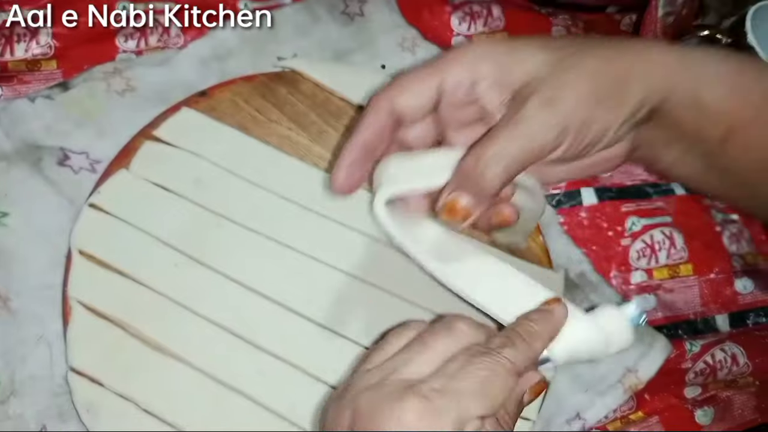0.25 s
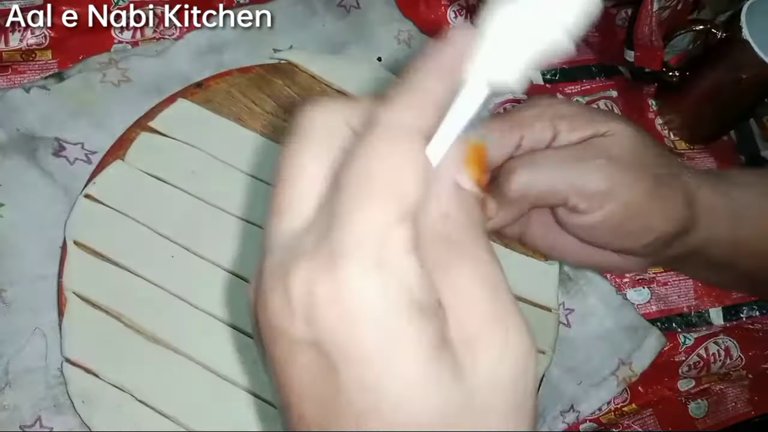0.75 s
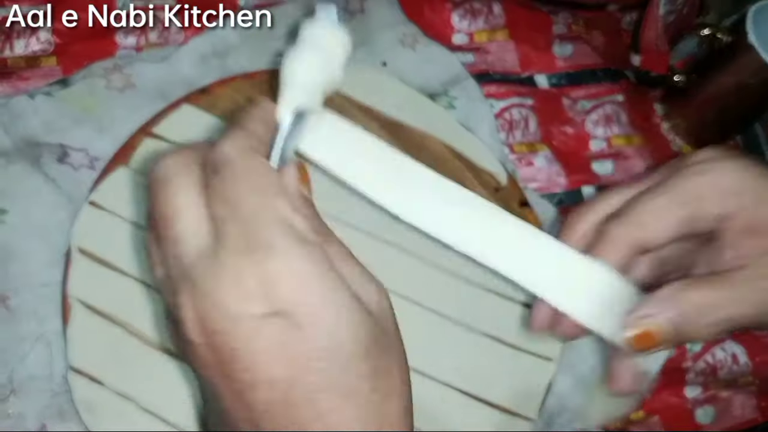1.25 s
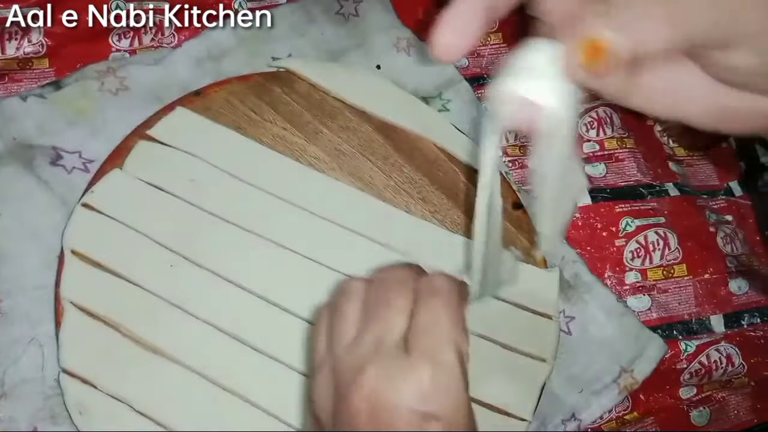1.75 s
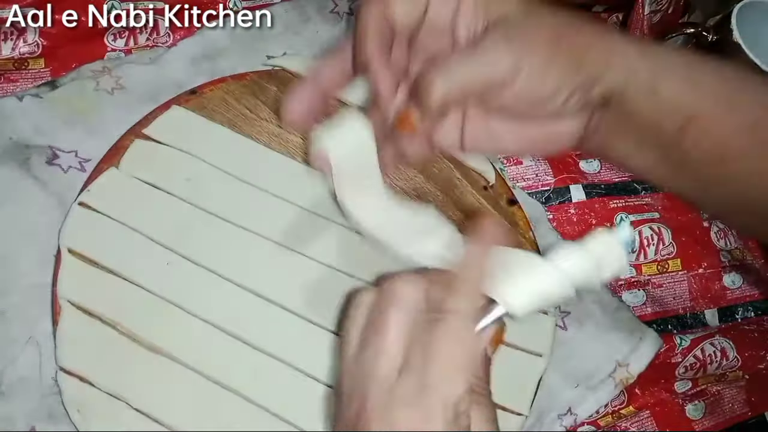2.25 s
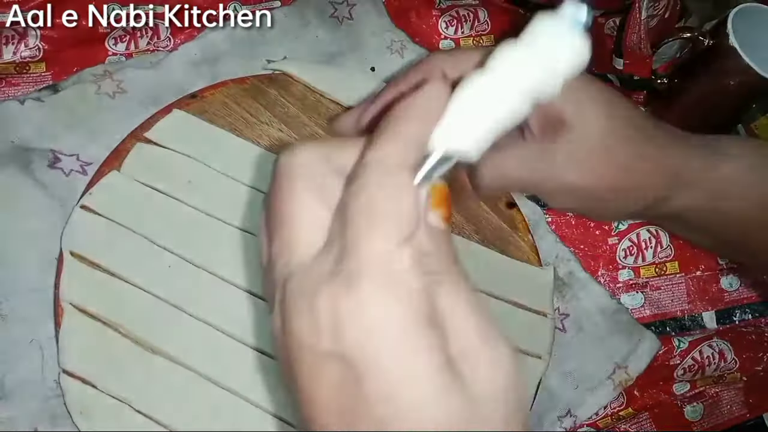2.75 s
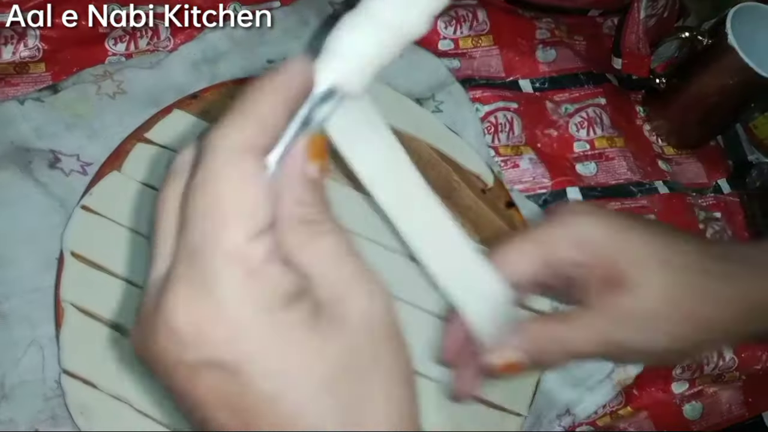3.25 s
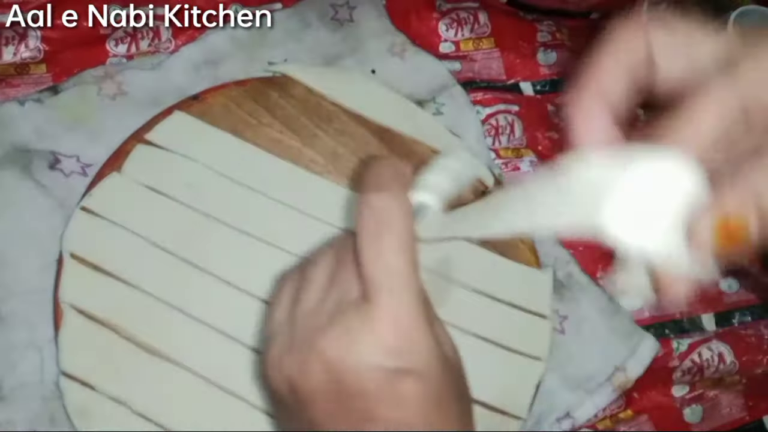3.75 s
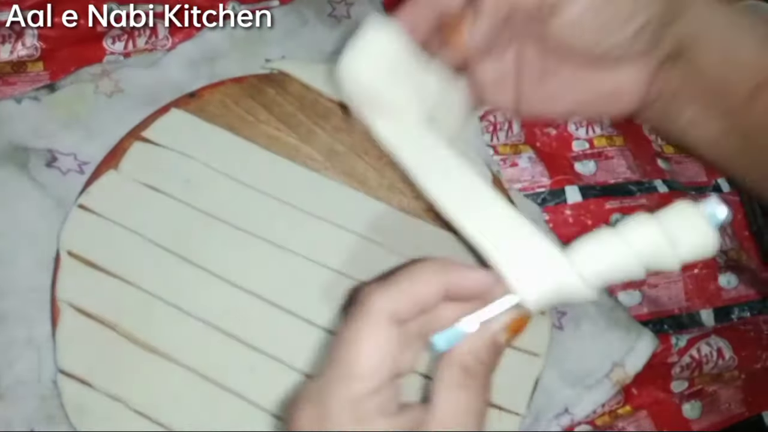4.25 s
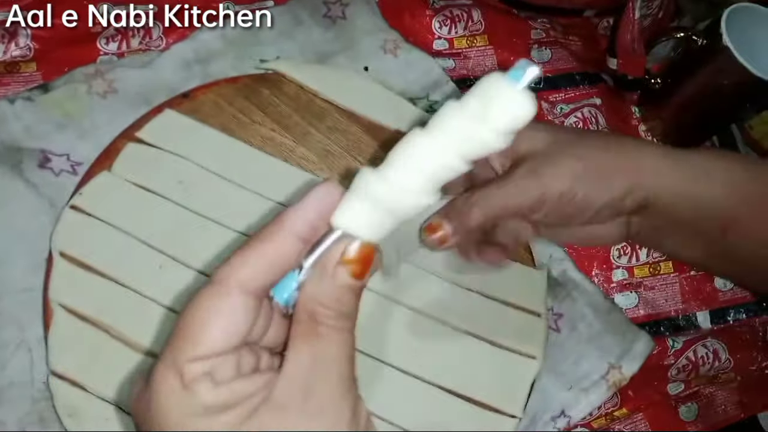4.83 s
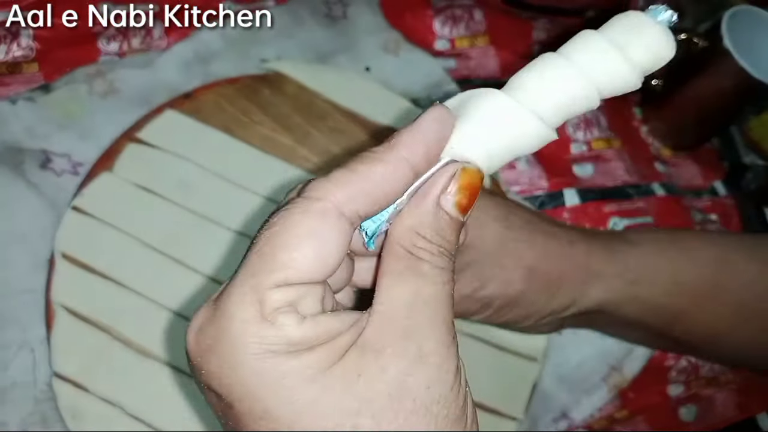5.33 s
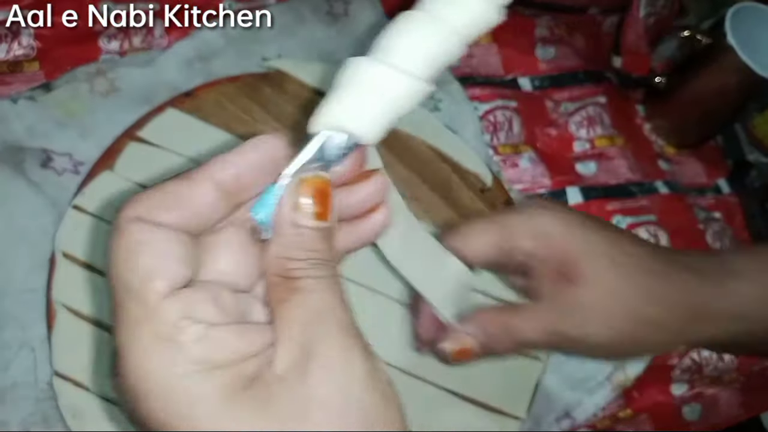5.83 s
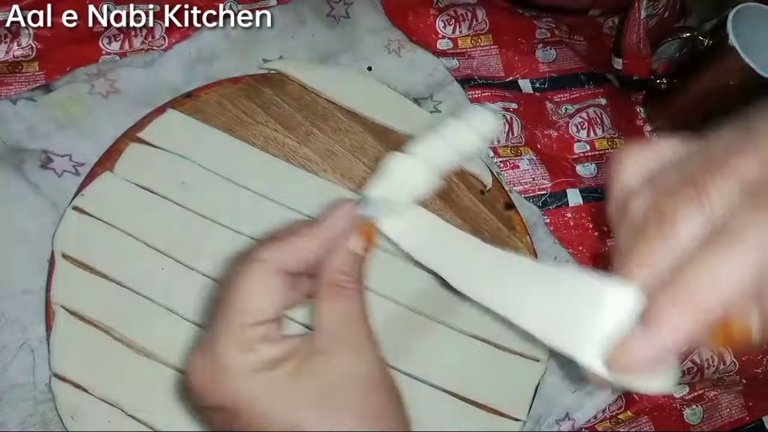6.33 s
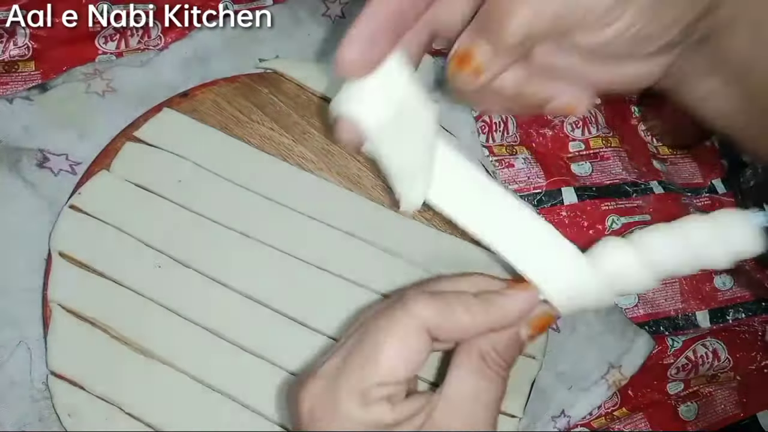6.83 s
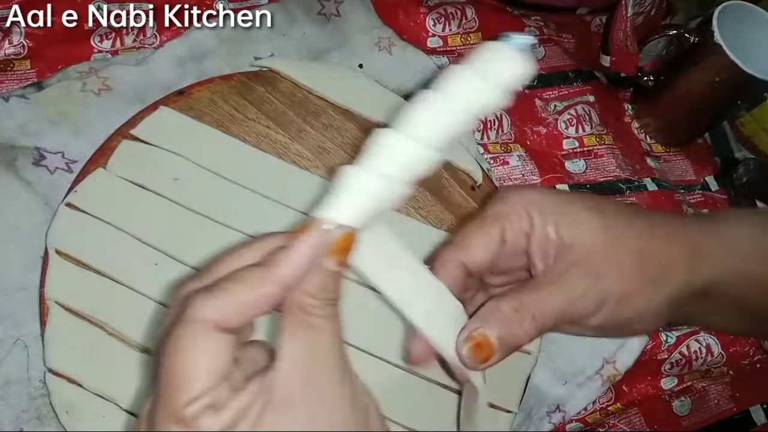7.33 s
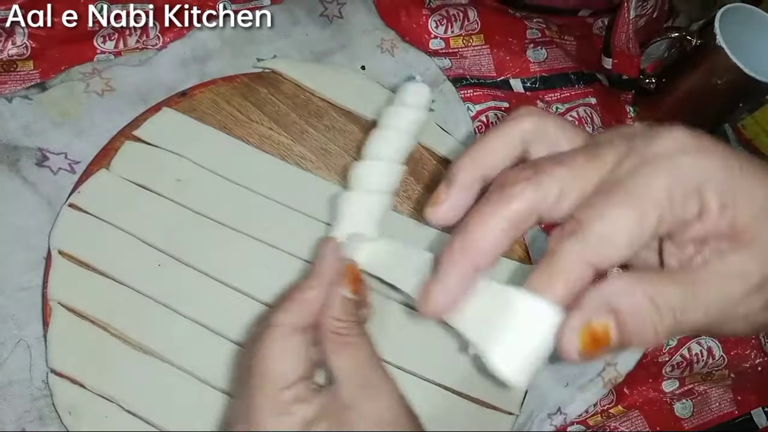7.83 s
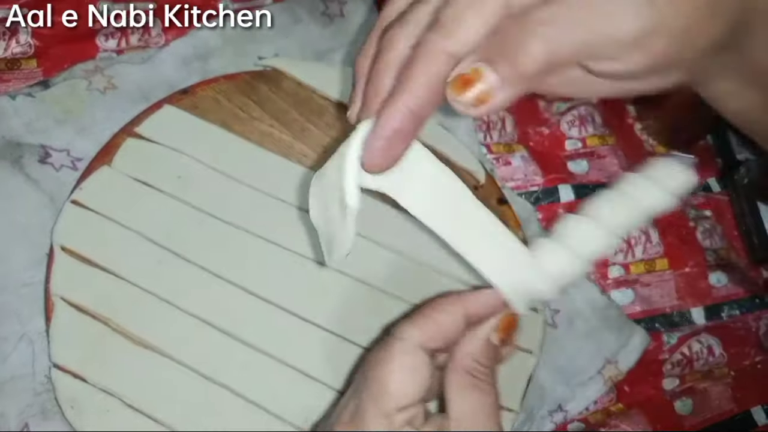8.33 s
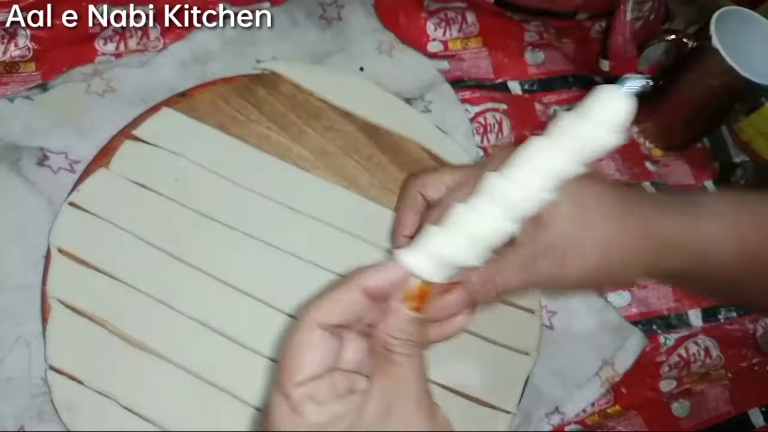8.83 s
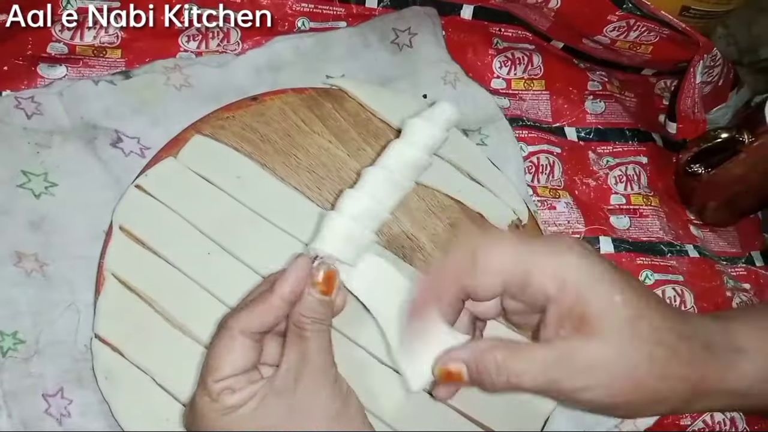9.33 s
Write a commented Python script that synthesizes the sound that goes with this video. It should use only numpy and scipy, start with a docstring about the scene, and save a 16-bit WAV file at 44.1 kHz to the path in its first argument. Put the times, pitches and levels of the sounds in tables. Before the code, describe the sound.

A bird repeats a slurred, whistled wail six times, echoing off nearby walls, while small songbirds chirp and buzz over a faint low hum.

```python
"""A place with nearby walls, whose reflections smear every call into a short echoing tail.
Filtered noise lies behind: a low rumble, a thin hiss, a faint hum whose upper lines swell and fade.
Small songbirds chirp, buzz and trill: near-pure tones gliding or warbling along pitch curves.
Over them a bird repeats one slurred wail six times, each dipping, arching up and falling away:
a sum of gliding harmonics, weighted by the resonance of its throat."""
import sys
import numpy as np
from scipy import signal
from scipy.fft import rfft, irfft
from scipy.io import wavfile
from scipy.ndimage import uniform_filter1d

SR = 44100
rng = np.random.default_rng(int(sys.argv[2]) if len(sys.argv) > 2 else 0)


def store_pcm(level_fs):
    """Save levels as 16-bit WAV."""
    pcm = np.round(np.clip(level_fs, -1, 1) * 32767).astype(np.int16)
    wavfile.write(sys.argv[1], SR, np.atleast_2d(pcm).T)


N = 421596
TIME = np.arange(N) / SR
BINS = np.fft.rfftfreq(N, 1 / SR)


def amp(db):
    """Decibel law: a level becomes an amplitude ratio."""
    return 10 ** (np.asarray(db) / 20)


def evened(x):
    """Root-mean-square normalization: scales a signal to rms 1."""
    return x / np.sqrt(np.mean(x ** 2) + 1e-20)


def read(points, hz):
    """Logarithmic interpolation: reads a table along a log-frequency axis."""
    f, value = np.transpose(points)
    return np.interp(np.log(hz + 1), np.log(f + 1), value)


def add(mix, s, sound):
    """Superposition: adds a sound into the mix at time s, cut at the mix's ends."""
    at = round(s * SR)
    sound = sound[max(-at, 0):]
    part = mix[max(at, 0):][:len(sound)]
    part += sound[:len(part)]


def wander(n, rate_hz):
    """Low-pass filtered noise: a slow random drift of about rms 1, for up to one second."""
    spectrum = rfft(rng.standard_normal(SR)) / (1 + (np.arange(SR // 2 + 1) / rate_hz) ** 4)
    return evened(irfft(spectrum))[:n]


def perform(voice, rows):
    """Superposition: places one note for each row, at the time in its first column."""
    out = np.zeros(N)
    for s, *note in rows:
        add(out, s, voice(*note))
    return out


# Spectrum of the background air, relative: (frequency [Hz], level [dB])
AIR_SPECTRUM = [(25, -29.5), (45, -7.5), (85, 3), (150, 2), (280, 0), (450, -7), (700, -9.5), (1200, -14),
                (1700, -17), (2100, -30), (3200, -24), (4200, -35), (5900, -24.5), (8000, -41)]


def air(level_db=-53.5, patchy_db=1.82):
    """Filtered noise: a low rumble and a thin hiss whose level drifts in time-frequency patches."""
    hz, _, z = signal.stft(rng.standard_normal(N), SR, nperseg=2048, noverlap=1536)
    patches = uniform_filter1d(rng.standard_normal(z.shape), size=16, axis=0)
    patches = evened(uniform_filter1d(patches, size=12, axis=1))
    # the drift is deepest near 3 kHz
    depth_db = patchy_db * read([(1500, 1), (3000, 1.7), (5500, 1)], hz)[:, None]
    noise = signal.istft(z * amp(depth_db * patches), SR, nperseg=2048, noverlap=1536)[1][:N]
    shaped = irfft(rfft(noise) * amp(read(AIR_SPECTRUM, BINS)), N)
    return amp(level_db) * evened(shaped)


# Lines of the hum, before any swell: (frequency [Hz], width at half amplitude [Hz], rms level [dB])
HUM_LINES = [(160, 11, -61.5), (382.5, 15, -72.5), (465.6, 33, -77)]
# Swell of every line but the lowest: (time [s], gain [dB])
HUM_SWELL = [(0, -2), (3.9, 1), (4.3, 11.5), (5.2, 12.5), (5.5, 1), (6.7, 10), (7.3, -1), (9.5, -10.5)]


def hum():
    """Narrow-band noise: resonance curves leave wavering lines; the upper ones swell and fade."""
    lines = []
    for hz, width, db in HUM_LINES:
        resonance = 1 / (1 + (2 * (BINS - hz) / width) ** 2)
        line = irfft(rfft(rng.standard_normal(N)) * resonance, N)
        lines.append(amp(db) * evened(line))
    low, *upper = lines
    return low + sum(upper) * amp(np.interp(TIME, *np.transpose(HUM_SWELL)))


# Late decay, t60 being the time to fall 60 dB: (frequency [Hz], t60 [s])
WALL_DECAY = [(300, 1.2), (1000, 0.89), (1700, 1.32), (3000, 1), (6000, 1.1), (12000, 0.15)]
# Single reflections off nearby walls: (delay [s], level [dB])
REFLECTIONS = [(0.01, -14.5), (0.038, -17.5), (.068, -11.5)]


def walls(x, wet_db):
    """Reverberation: direct sound, single reflections, and a tail decaying exponentially by band."""
    taps = rng.choice([-1., 1.], SR) * (rng.random(SR) < 1 / 10)  # sparse echoes of random sign
    taps[:SR // 250] = 0  # the tail holds back for 4 ms
    hz, t, z = signal.stft(taps, SR, nperseg=256)
    # close walls answer first, in a quick decay; a weaker tail lingers
    late = amp(-60 * t / read(WALL_DECAY, hz)[:, None])
    decay = late * (1 + amp(3.5 - 60 * t / 0.27))
    tail = signal.istft(z * decay, SR, nperseg=256)[1]
    response = amp(wet_db) * tail / np.linalg.norm(tail)
    for delay, db in REFLECTIONS:
        response[round(delay * SR)] += amp(db)
    return x + signal.fftconvolve(x, response)[:N]


def far_echo(x, delay, db, dull_hz=3200):
    """Delayed reflection: a distant wall returns the songbirds later, dulled on the way."""
    out = np.zeros(N)
    dulled = irfft(rfft(x) / (1 + (BINS / dull_hz) ** 6), N)
    add(out, delay, amp(db) * walls(dulled, wet_db=9.0))
    return out


def far_birds(db=-83, spread_db=3, count=220):
    """Superposition of many sources: faint short slurs from further away blur into a twitter."""
    s, length, pitch, slope, size = rng.random((count, 5)).T
    hz = 3500 + 2100 * pitch
    glide_hz = 1400 * (slope - .65)  # mostly falling
    seconds = .02 + .04 * length
    level_db = db + spread_db * (2 * size - 1)
    rows = [s * N / SR, seconds, hz - glide_hz, hz + glide_hz, np.ones(count), level_db]
    return perform(slur, np.transpose(rows))


def whistle(hz, fade):
    """Frequency modulation: a near-pure tone sums a pitch curve into phase, faded at both ends."""
    tone = np.sin(2 * np.pi * np.cumsum(hz) / SR)
    return evened(tone * signal.windows.tukey(len(hz), fade))


def chirp(hz, db, quaver=0.0059):
    """Random frequency modulation: one short note, unsteady by the quaver (rms share of pitch)."""
    unsteady = hz * (1 + quaver * wander(len(hz), rate_hz=170))
    return amp(db) * whistle(unsteady, fade=.25)  # a quarter of the note goes on fades


def contour(points):
    """Smoothed interpolation: a pitch curve through (time [s], value) points."""
    s, value = np.transpose(points)
    curve = np.interp(np.arange(0, s[-1], 1 / SR), s, value)
    return uniform_filter1d(curve, size=200, mode="nearest")


def warble(length, hz, swing_hz, rate, db, rough=0.026, climb=0):
    """Joint frequency and amplitude modulation: an uneven sweep, loudest on each downstroke."""
    n = int(length * SR)
    u = np.linspace(0, 1, n)
    uneven_rate = rate * (1.1 - .2 * u + .085 * wander(n, rate_hz=90))  # slows down as it goes
    cycle = 2 * np.pi * np.cumsum(uneven_rate) / SR
    scoop = -.22 * np.exp(-u / .08)  # starts below pitch
    centre = hz * (1 + scoop + climb * (u - .5) + rough * wander(n, rate_hz=200))
    tone = whistle(centre + swing_hz * np.cos(cycle), fade=.65)
    return amp(db) * evened(tone * (1 + .85 * np.sin(cycle)))


# One row a fine buzz: (time [s], length [s], centre pitch [Hz], level [dB])
BUZZES = [(-0.055, 0.135, 2770, -51), (0.737, 0.089, 3130, -63), (0.996, 0.2, 2710, -67),
          (1.25, 0.14, 2190, -67.5), (2.035, 0.15, 2713, -51), (3.695, 0.17, 2690, -69),
          (4.12, .07, 2490, -69.5), (4.759, 0.14, 2690, -51.5), (6.878, 0.13, 2680, -51)]


def buzz(length, hz, db):
    """Modulation at an audible rate: a narrow warble, so fast that it rasps."""
    return warble(length, hz, swing_hz=130, rate=210, db=db, rough=.025)


# One row a coarse rising trill: (time [s], length [s], centre pitch [Hz], swing [Hz], level [dB])
TRILLS = [(0.182, .04, 3580, 503, -56.5), (0.293, .05, 4000, 600, -60), (2.472, 0.12, 4390, 497, -64.5),
          (5.665, 0.12, 4440, 900, -65), (6.929, 0.125, 4470, 233, -57)]


def trill(length, hz, swing_hz, db):
    """Slow frequency modulation: a warble wider than the buzz, climbing as it goes."""
    return warble(length, hz, swing_hz, rate=77, db=db, climb=0.093)


# One row a low chirrup: (time [s], level [dB])
CHIRRUPS = [(0.076, -53), (0.227, -51.5), (2.311, -50), (5.028, -49.5), (7.145, -50), (7.543, -58.5)]
# A chirrup drops, rebounds and drops again: (time [s], pitch [Hz])
CHIRRUP_PITCH = [(0, 3070), (.007, 2210), (.015, 2030), (.023, 2060), (.031, 2313), (.044, 2130),
                 (.053, 1610)]


def chirrup(db):
    """Fixed pitch contour: a low two-part note, a little scratchy and alike every time."""
    return chirp(contour(CHIRRUP_PITCH), db, quaver=.022)


# One row a swooping whistle: (time [s], top pitch [Hz], level [dB])
SWOOPS = [(4.164, 4920, -63.5), (4.494, 4670, -61)]
# A swoop crests, plunges and climbs back: (time [s], pitch [share of the top pitch])
SWOOP_PITCH = [(0, 0.51), (.018, 0.98), (.033, .98), (.049, .63), (.058, .585), (.092, .79), (.112, .85),
               (.128, .845)]


def swoop(top_hz, db):
    """Scaled pitch contour: a whistle that goes up, down and up again."""
    return chirp(top_hz * contour(SWOOP_PITCH), db)


# One row a falling slur: (time [s], length [s], first pitch [Hz], last pitch [Hz],
# bend [exponent; under 1 it plunges then levels out, over 1 it hangs then plunges], level [dB])
FALLS = [(0.017, 0.047, 5870, 3350, 0.87, -57.5), (0.118, .03, 5000, 3070, 1.1, -56),
         (0.13, 0.044, 4780, 3600, 2.6, -59.5), (0.28, 0.035, 6100, 3315, 0.82, -59),
         (2.302, 0.054, 5430, 3810, 1.26, -59.5), (2.311, 0.075, 4850, 3280, 0.51, -62),
         (2.69, .125, 4950, 3360, 0.85, -52.5), (5.522, 0.053, 4990, 4420, 0.78, -60.5),
         (5.81, 0.012, 5110, 3420, 1.2, -59), (5.906, 0.11, 6740, 5240, 0.96, -62.5),
         (6.037, 0.066, 3960, 2700, 3.6, -57.5), (6.076, .08, 5900, 3160, 0.95, -59),
         (6.324, 0.038, 6240, 3840, 0.75, -58.5), (6.58, .05, 5030, 3170, 1.1, -55.5),
         (7.82, .055, 4960, 3860, 0.71, -54), (8.136, 0.072, 6480, 5140, .7, -66.5),
         (8.157, 0.064, 4980, 4370, 0.74, -52), (8.788, 0.023, 5180, 3470, 0.93, -60.5),
         (9.421, .055, 6720, 3500, 1.23, -58.5), (9.533, 0.022, 5440, 3720, 1.1, -58.5)]


def slur(length, from_hz, to_hz, bend, db):
    """Exponential glide: pitch moves by ratio, its speed shifted early or late by the bend."""
    progress = np.linspace(0, 1, int(length * SR)) ** bend
    return chirp(from_hz * (to_hz / from_hz) ** progress, db)


# One row a rising slur: (time [s], length [s], starting pitch [Hz], level [dB])
RISES = [(0, .018, 3400, -54), (1.494, 0.033, 4920, -62), (1.832, 0.015, 4360, -58.5),
         (5.462, 0.013, 3400, -59.5), (6.288, .014, 3380, -53.5), (8.882, 0.031, 3540, -58.5)]


def rise(length, from_hz, db):
    """Constant frequency ratio: a nearly even slur upward by 3:2."""
    return slur(length, from_hz, from_hz * 1.5, 0.93, db)


# One row an arched peep: (time [s], length [s], top pitch [Hz], level [dB])
PEEPS = [(0.169, .065, 4150, -53.5), (0.828, 0.033, 3140, -58.5), (0.881, 0.034, 3600, -54),
         (0.932, 0.012, 3740, -59), (0.944, 0.015, 3300, -58.5), (2.379, .18, 3430, -61.5),
         (2.652, .065, 4950, -56.5), (5.22, 0.036, 3220, -61.5), (6.142, 0.064, 3030, -60),
         (6.244, 0.02, 4100, -54.5), (6.41, 0.036, 3500, -59), (6.474, 0.027, 4000, -55.5),
         (6.592, 0.036, 3250, -61.5), (7.167, 0.021, 3060, -55.5), (7.871, .024, 4490, -51.5),
         (7.984, .09, 3580, -61), (8.26, 0.065, 3930, -60)]


def peep(length, top_hz, db):
    """Parabolic glide: one shallow arch whose ends sag by a share of the top pitch."""
    sag = 0.11 * np.linspace(-1, 1, int(length * SR)) ** 2
    return chirp(top_hz * (1 - sag), db)


# Resonance of the wailing bird's throat, relative: (frequency [Hz], gain [dB])
THROAT = [(850, -29.5), (1000, -3), (1400, 4), (1850, -8), (2050, -13.5), (2350, -20), (2700, -26),
          (3500, -26.5), (4300, -32), (5400, -21), (6400, -29), (7400, -23), (9000, -22.5), (11000, -30)]
# Effort in every wail: (phase [-1 start, 0 top, 1 end], gain [dB])
EFFORT = [(-1.007, -11), (-0.93, 1), (-.66, -1.5), (-0.4, 1.5), (0.086, 5), (0.39, -2), (0.64, -11.5),
          (0.96, -14)]
# Pitch shape: heights in units of the climb from dip to top,
# widths in shares of the time before or after the top
HOOK_S, HOOK_HEIGHT = .015, .39  # a quick flick upward at the start
CLIMB_WIDTH, CLIMB_POWER = .36, 2.5
FALL_WIDTH, FALL_DEPTH, FALL_POWER = .58, 2.35, 2.05


def wail(start, top, end, dip_hz, top_hz, opening_db, arch_db, odd_opening_db, odd_arch_db,
         bright_opening_db, bright_arch_db, jitter=0.0024, shimmer_db=4.0):
    """Source and filter: gliding harmonics; the throat makes a whistle of the second harmonic."""
    t = np.arange(start, end, 1 / SR)
    phase = np.interp(t, [start, top, end], [-1, 0, 1])
    # the pitch flicks up, settles in the dip, climbs to the top and falls far below
    hook = HOOK_HEIGHT * (t - start) / HOOK_S * np.exp(1 - (t - start) / HOOK_S)
    climb = np.exp(-abs(phase / CLIMB_WIDTH) ** CLIMB_POWER)
    fall = 1 - FALL_DEPTH * (1 - np.exp(-abs(phase / FALL_WIDTH) ** FALL_POWER))
    arch = hook + np.where(phase < 0, climb, fall)
    hz = (dip_hz + (top_hz - dip_hz) * arch) * (1 + jitter * wander(len(t), rate_hz=61))
    turns = np.cumsum(hz) / SR
    # odd harmonics move from their starting level to that of the opening, then to that of the arch
    odd_db = np.interp(phase, [-.87, -.72, -.35, 0.019],
                       [-16, odd_opening_db, odd_opening_db, odd_arch_db])
    # the overtones take their arch level at the crest and die first as the call falls away
    bright_db = np.interp(phase, [-.4, -0.18, 0.21, 0.63],
                          [bright_opening_db, bright_arch_db, bright_arch_db, -11])
    voice = np.zeros(len(t))
    for k in range(1, 13):
        flutter_db = shimmer_db * wander(len(t), rate_hz=22.6)
        overtone_db = (k > 2) * (bright_db + flutter_db)
        harmonic_db = read(THROAT, k * hz) + odd_db * (k % 2) + overtone_db
        voice += amp(harmonic_db) * np.sin(2 * np.pi * k * turns)
    effort_db = np.interp(phase, *np.transpose(EFFORT))
    level_db = effort_db + np.interp(phase, [-.5, -.15], [opening_db, arch_db])
    return np.sqrt(2) * amp(level_db) * voice * signal.windows.tukey(len(t), .03)


# One row a wail, its levels relative, under the effort and the throat:
# (start [s], top [s], end [s], pitch at the dip [Hz], pitch at the top [Hz],
# level of the opening [dB], of the arch [dB], odd harmonics in the opening [dB], in the arch [dB],
# overtones in the opening [dB], in the arch [dB])
WAILS = [(0.135, 0.454, .615, 657.4, 814.7, -51, -44, 1.5, -3, -1.5, -2.5),
         (1.698, 2.032, 2.23, 670, 871.3, -48.5, -42.5, -1.5, -10, -4.5, 0),
         (3.244, 3.573, 3.76, 718, 902.4, -46, -41, -36, -33, -2.5, 1),
         (4.957, 5.274, 5.48, 699, 899.3, -46, -42, -6, -21, -3.5, 1),
         (7.019, 7.355, 7.555, 676.4, 891.6, -48, -42, 6.5, -12.5, -9, 1.5),
         (8.612, 8.93, 9.13, 717, 921, -42.5, -40, -4.5, -33, -3, -1)]


def wailing_bird():
    """Superposition: the six wails, each at its own start."""
    wails = np.zeros(N)
    for row in WAILS:
        add(wails, row[0], wail(*row))
    return wails


def scene():
    """Superposition: background, distant and near songbirds, and the wailing bird, with echoes."""
    background = air() + hum()
    distant = walls(far_birds(), wet_db=8)
    low_song = perform(buzz, BUZZES) + perform(chirrup, CHIRRUPS)
    high_song = (perform(swoop, SWOOPS) + perform(slur, FALLS) + perform(rise, RISES)
                 + perform(peep, PEEPS) + perform(trill, TRILLS))
    songbirds = walls(low_song, wet_db=-7.0) + walls(high_song, wet_db=-9.5)
    songbirds += far_echo(low_song + high_song, delay=0.11, db=-21.5)
    caller = walls(wailing_bird(), wet_db=-4.5)
    return (background + distant + songbirds + caller)[None]


# Treble response: (frequency [Hz], gain [dB])
TREBLE = [(5700, -2), (6150, -9.5), (6550, -21), (7100, -27.5), (9000, -30.5), (9400, -40.5)]


def record(dry, hiss_db=-96, edge_hz=15500):
    """Low-pass filtering: the treble drops off sharply, faint steady hiss joins, the band ends."""
    dull = irfft(rfft(dry) * amp(read(TREBLE, BINS)), N)
    hissing = dull + amp(hiss_db) * rng.standard_normal(N)
    band_limit = signal.firwin(511, edge_hz, window=("kaiser", 9), fs=SR)
    return signal.oaconvolve(hissing, band_limit[None], "same")


dry = scene()
out = record(dry)
store_pcm(out)
```